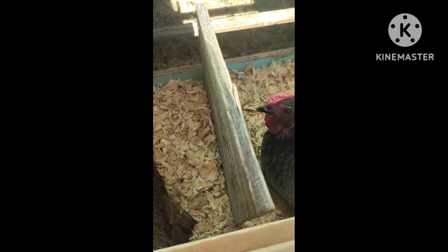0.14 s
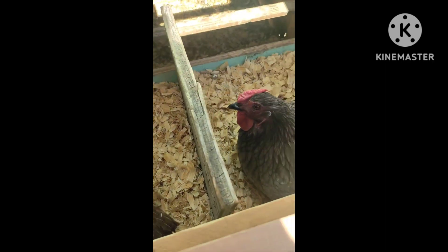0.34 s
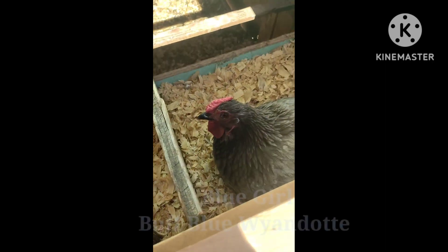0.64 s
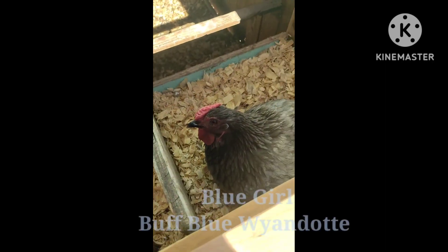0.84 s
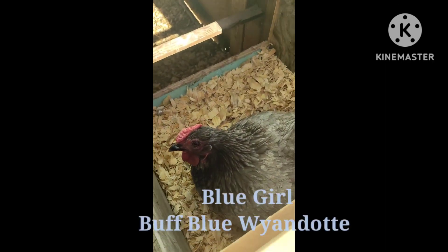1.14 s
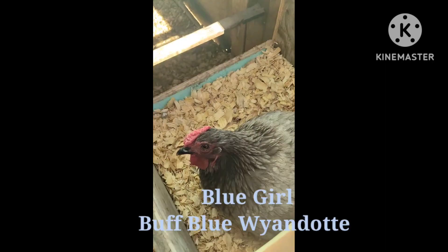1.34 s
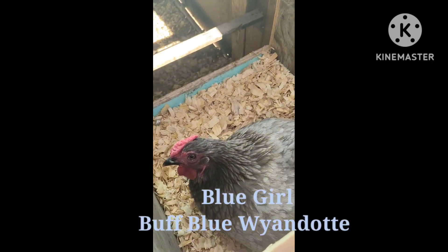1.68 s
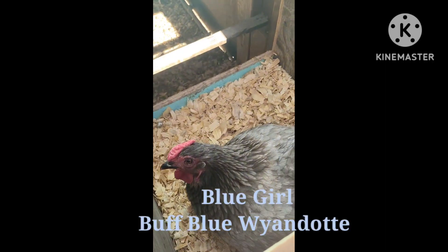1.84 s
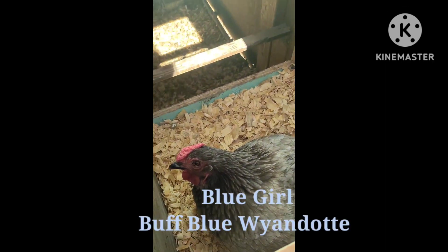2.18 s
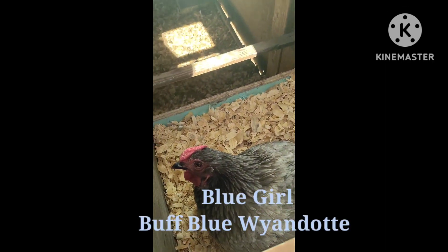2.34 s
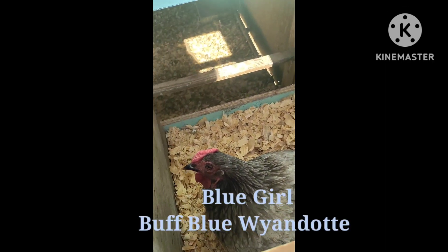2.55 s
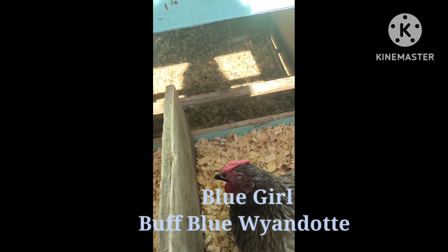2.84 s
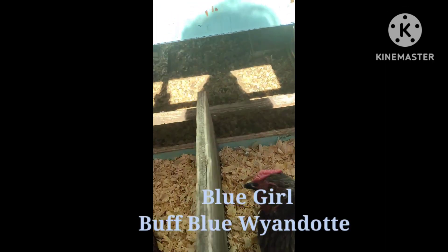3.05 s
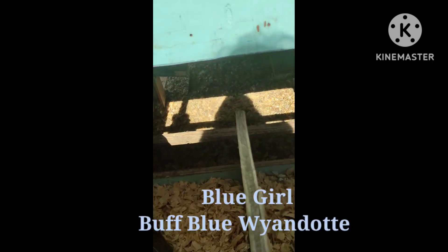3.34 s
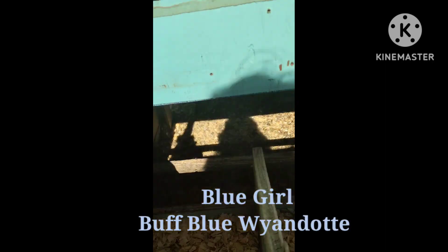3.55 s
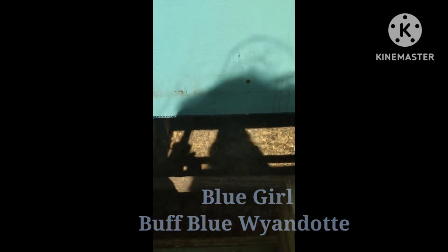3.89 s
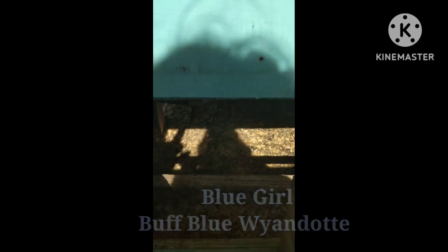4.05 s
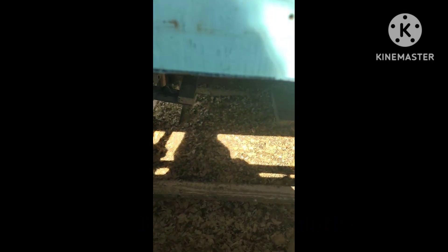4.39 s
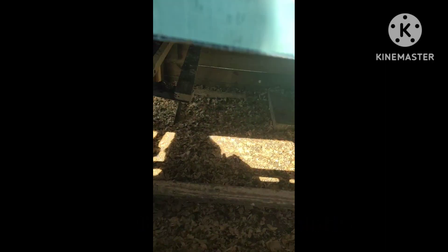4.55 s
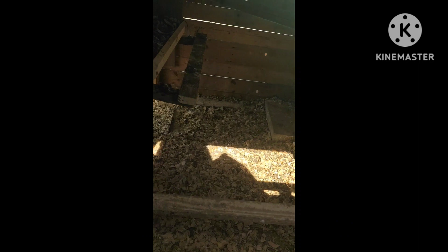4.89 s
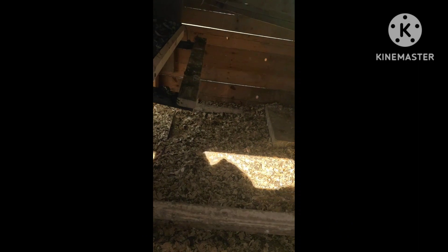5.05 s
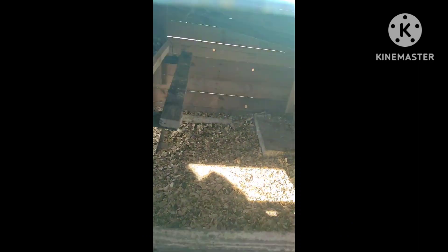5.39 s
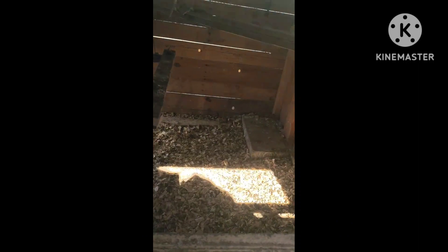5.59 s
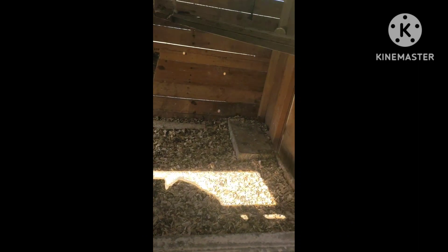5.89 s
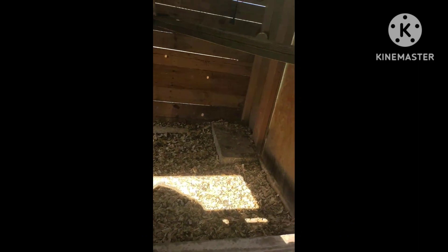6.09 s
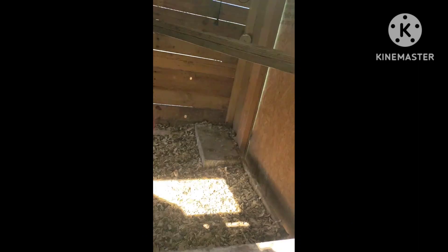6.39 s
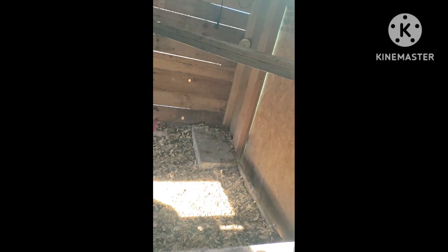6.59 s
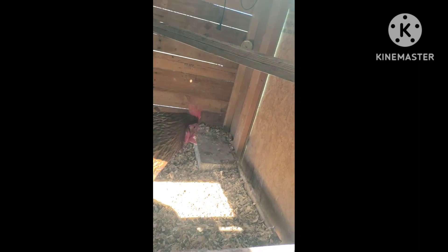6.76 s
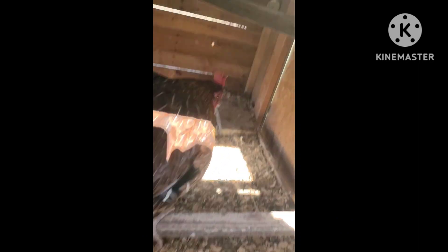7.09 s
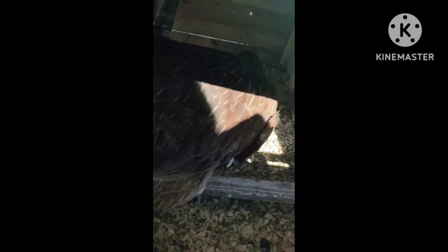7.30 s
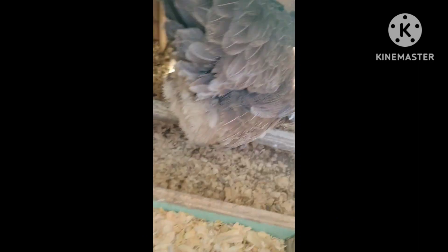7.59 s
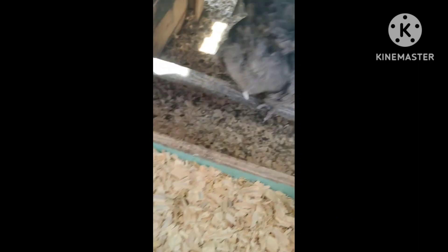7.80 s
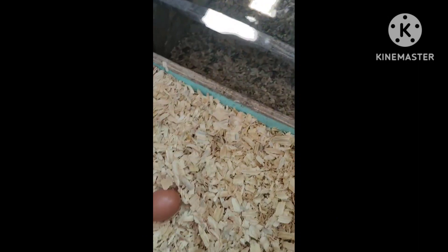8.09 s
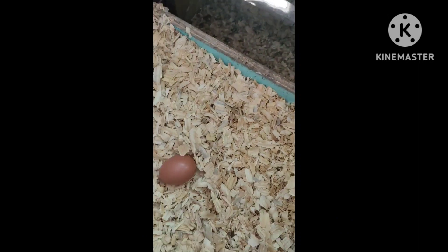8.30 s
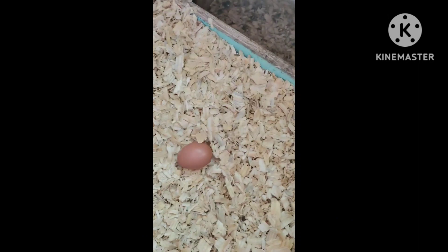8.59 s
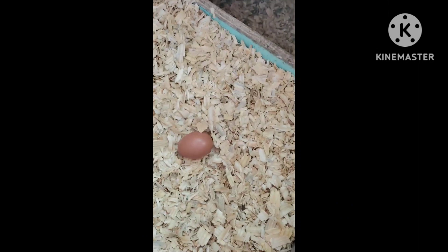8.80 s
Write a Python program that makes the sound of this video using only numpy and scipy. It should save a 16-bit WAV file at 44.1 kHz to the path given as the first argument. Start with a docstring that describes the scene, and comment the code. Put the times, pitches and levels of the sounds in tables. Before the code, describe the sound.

Wind buffets the microphone as a hen moans hoarsely and whines; boards knock, two harsh squawks burst out, then shavings crackle and soft clucks follow.

```python
"""Air buffets a microphone while rustling and a thin far whistle are heard; soon a hen moans low and hoarse.
Clucks, a wavering whine, two loud squawks and a growl follow, among knocked boards and snapping shavings.
Every call starts as pulses from the hen's voice box, which are coloured by the throat and let out by the beak.
Boards ring as fading tones; air, cloth, shavings and the yard are filtered noise; far birds are thin tones."""
import sys
import numpy as np
from scipy import signal
from scipy.fft import rfft, irfft, next_fast_len
from scipy.io import wavfile
from scipy.ndimage import uniform_filter1d, map_coordinates

SR = 44100
rng = np.random.default_rng(int(sys.argv[2]) if len(sys.argv) > 2 else 0)


def wav_out(sig):
    """Save sig, one row per channel (or a flat mono array), as 16-bit PCM at SR to the path in sys.argv[1]."""
    wavfile.write(sys.argv[1], SR, np.round(np.clip(np.atleast_2d(sig).T, -1, 1) * 32767).astype(np.int16))


N = 394254
TIME = np.arange(N) / SR
CUTOFF_HZ = 7900

# voice of each moan, and of the growl: time_s, pitch_hz, roughness (0-1)
MOAN_VOICE = [
    [(.31, 123, 0.75), (.41, 134.6, 0.2), (.55, 141.9, 0.37), (.64, 144.1, 0.03), (.745, 144.6, 0.03),
     (.8, 135, 0.13), (.87, 120.4, 0.34)],
    [(2.445, 127.1, 1.05), (2.55, 137, 0.3), (2.82, 144, 0.29), (2.95, 142.2, 0.1), (2.99, 131.2, 0.2)],
]
GROWL_VOICE = [(6.855, 130, 0.28), (6.93, 149, 0.76), (6.98, 148, 0.061), (7.06, 139.1, 0.62),
               (7.14, 118, 0.26)]
# loudness of each moan: time_s, lower_resonance_db, upper_resonance_db, overtones_db
MOAN_LEVEL = [
    [(.31, -54.5, -60, -67), (.42, -56.5, -50.5, -67), (.6, -53, -51, -59), (.77, -58, -56, -64),
     (.87, -61, -73, -80)],
    [(2.445, -47, -60, -69), (2.56, -51.5, -49, -64.5), (2.7, -50.5, -48, -57), (2.88, -52, -46, -55.5),
     (2.99, -50, -53.5, -61)],
]
# loudness of the growl: time_s, body_db, overtones_db
GROWL_LEVEL = [(6.855, -48.5, -79), (6.905, -51.5, -57.5), (6.985, -40, -50), (7.02, -50, -57.5),
               (7.085, -53, -65), (7.14, -72, -90)]
# pitch that each whine aims at: time_s, pitch_hz
WHINE_PITCH = [
    [(1.42, 446), (1.47, 423), (1.56, 519), (1.615, 502), (1.65, 430.2), (1.85, 456), (2.11, 479),
     (2.19, 448), (2.3, 477), (2.4, 427)],
    [(5.34, 436.5), (5.46, 430.3), (5.56, 465), (5.86, 445.3), (5.925, 411), (5.96, 335)],
]
# loudness of each whine: time_s, fundamental_db, overtones_db
WHINE_LEVEL = [
    [(1.42, -53, -69), (1.442, -48.5, -46), (1.57, -48, -57), (1.656, -45.5, -48.5), (2.108, -43, -46.5),
     (2.142, -41.5, -42), (2.346, -43, -44), (2.386, -52, -49.5), (2.41, -84, -58)],
    [(5.335, -52, -57), (5.388, -46, -39), (5.512, -37.5, -39), (5.654, -38, -41.5), (5.728, -53, -43.5),
     (5.776, -45.5, -35), (5.798, -48.5, -46), (5.94, -52, -39.5)],
]
# whines, dull when the hen faces away: start_roughness (0-1), end_roughness (0-1), end_treble_db
WHINES = [(0.2, 0.7, -4.5), (.35, 0.08, -14)]
# the whining voice slips off its pitch and back: middle_s, length_s, jump_hz
SLIPS = [(1.986, 0.028, 34), (2.081, 0.048, 184.5), (5.38, 0.031, -36), (5.423, 0.018, -41.5),
         (5.7, 0.022, -49), (5.744, 0.025, -72), (5.821, 0.031, -40.5), (5.893, 0.017, -49)]
WHINE_ROUGH_START_S = 0.16   # time in which the first roughness dies down
WHINE_SLIP_ROUGH = 0.25   # roughness added while the voice slips
WHINE_BRIGHTEN_DB = 1.5   # the treble gains this much as she strains through the call
# pitch of each squawk: time_s, pitch_hz
SQUAWK_PITCH = [
    [(5.965, 443), (5.99, 480.6), (6.012, 450), (6.03, 536), (6.046, 581), (6.09, 583), (6.118, 611),
     (6.13, 543), (6.152, 524), (6.205, 446.6)],
    [(6.305, 431), (6.33, 528), (6.355, 484.6), (6.372, 542.6), (6.436, 577.7), (6.47, 489), (6.5, 449)],
]
# loudness of each squawk, a short lead-in before the full cry:
# time_s, first_resonance_db, second_resonance_db, rasp_db
SQUAWK_LEVEL = [
    [(5.965, -44, -60, -61), (5.989, -27, -41, -44), (6.015, -29, -40, -40), (6.035, -20, -27, -31),
     (6.072, -18.5, -32, -30), (6.093, -12.5, -34, -34), (6.14, -17, -21, -32), (6.163, -23, -35, -35),
     (6.205, -51, -63, -63)],
    [(6.305, -44, -64, -65), (6.333, -22, -32, -36), (6.361, -29, -41, -40), (6.402, -14.5, -25, -24.5),
     (6.423, -16, -32, -33), (6.447, -15.5, -23.5, -29), (6.467, -21, -36, -36), (6.5, -51, -61, -59)],
]
# a squawk breaks from a clear tone into a rasp: middle_s, length_s, added_roughness (0-1)
BREAKS = [(5.975, .035, .65), (6.058, .03, .55), (6.105, .05, .25), (6.172, .03, .7), (6.325, .035, .45),
          (6.44, .025, .6), (6.485, .035, .7)]
# strong-weak pulses, which sound lines half way between the harmonics: middle_s, length_s
DOUBLINGS = [(6.05, 0.051), (6.152, 0.025), (6.453, 0.02)]
DOUBLING_DEPTH, SQUAWK_CLEAR_ROUGH, SQUAWK_AIR_DB = 0.98, 0.13, -6
# clucks: loudest_s, level_db, swell_s, half_fade_s, pitch_hz, roughness (limited to 0-1),
# overtones_db (relative to the level), lower_resonance_hz, upper_resonance_hz
CLUCKS = [(1.094, -44.5, 0.0046, 0.0061, 139.1, 0.36, -21, 623, 1310),
          (1.245, -47, 0.0052, 0.0075, 140.7, 1.08, -21, 680, 1290),
          (1.314, -58.5, 0.0026, 0.0044, 400, 0, -23, 796, 1200),
          (3.002, -46, 0.03, 0.008, 474, 0.7, -19, 700, 1000),
          (3.12, -63.5, 0.12, 0.063, 138.2, 1.1, -10.5, 680, 980),
          (5.777, -31, 0.025, 0.0026, 447.2, 0.65, -8, 910, 1380),
          (8.248, -42, 0.01, 0.011, 390.3, 0.35, -22, 728, 945),
          (8.551, -36, 0.018, 0.0046, 481.4, 0.71, -13, 830, 1050),
          (8.806, -41, 0.022, 0.015, 454.4, 0.54, -16.5, 745, 1020)]
# throat colour of each kind of call: frequency_hz, gain_db
MOAN_THROAT = [(140, -2), (280, -21), (425, -10.5), (570, -12), (720, -5.5), (850, 6.5), (1000, -2.5),
               (1140, 4), (1290, -6.5), (1450, -4), (1620, -12), (1920, -13), (2200, -19.5), (2750, -13.5),
               (3500, -31), (6500, -45)]
GROWL_THROAT = [(145, 0.5), (300, -30.5), (680, -21), (1030, 14), (1350, 0), (1800, -14), (2070, -10),
                (2250, -21), (3200, -16.5), (4080, -37), (4800, -23), (7000, -41.5)]
WHINE_THROAT = [(290, -4.5), (450, 6.5), (680, 4.5), (930, 0.5), (1350, -16.5), (1800, -29.5),
                (2300, -28.5), (2900, -21.5), (3650, -23), (4100, -41), (4650, -24), (6500, -64)]
SQUAWK_THROAT = [(540, -15), (700, -16), (930, -2), (1170, 9), (1370, 1), (1600, -15), (1850, -21),
                 (2200, -14), (2520, -21), (2780, -11), (3500, -26), (4300, -38), (5200, -29), (6200, -25),
                 (7800, -47)]
CLUCK_THROAT = [(200, 4), (450, -8.5), (800, 1.5), (2000, -7), (3050, -8), (3800, -25)]
MOAN_THROAT_HZ, GROWL_THROAT_HZ, SQUAWK_THROAT_HZ = 141.8, 149, 578   # pitch at which each colour holds
THROAT_FOLLOWS = 0.43   # share of a pitch change that the throat resonances follow
SHIMMER_DB, SHIMMER_FULL_HZ = 4.5, 3500   # each partial flickers on its own, the high ones most
# knocks on the boards: start_s, thud_db, thud_hz, clack_db
KNOCKS = [(4.3735, -22.5, 130, -28.5), (4.394, -33.5, 180, -40), (4.508, -37.5, 139, -39),
          (5.095, -42.5, 151, -58), (5.163, -58, 183, -43), (8.265, -29.5, 83, -48),
          (8.744, -32.5, 59.3, -68.5), (8.798, -26, 179, -59)]
# modes of the boards: frequency_hz, level_db (relative to the clack), t60_s
BOARD = [(204, -5, 0.12), (363, -34, 0.042), (525, -14.5, 0.18), (670, -5.5, 0.067), (685, -5, 0.051),
         (1020, -26, 0.019), (1210, -20, 0.092), (2230, -34, 0.022)]
# shavings snapping and shifting underfoot: time_s, crisp_top_db, dull_middle_db
SNAPS = [(0.38, -62, -84), (3.659, -72, -59.5), (3.9, -67, -61.5), (4.429, -53, -57), (5.489, -43, -45.5),
         (5.634, -52, -50), (6.652, -50, -45.5), (6.695, -52, -50), (7.224, -67, -55), (7.6598, -53, -57.5),
         (7.889, -61, -57.5), (8.021, -44, -45.5), (8.0613, -38, -46), (8.132, -48.5, -50),
         (8.2457, -38, -62), (8.287, -54, -53)]
# colours of the crisp and the dull part of a snap: frequency_hz, gain_db
SNAP_COLOUR = [(3800, -9.5), (5000, 8), (6500, 7.5), (7800, -11.5)]
SNAP_DULL_COLOUR = [(900, -2.5), (3000, -5.5), (4200, -15)]
# feet scuffing through the shavings: start_s, held_s, level_db
SCUFFS = [(3.6, 0.13, -71.5), (5.45, 0.38, -73.5), (6.59, 0.086, -63.5), (7.63, 0.16, -72.5),
          (7.89, 0.21, -68.5), (8.25, 0.073, -63)]
SCUFF_RISE_DB_PER_S, SCUFF_FADE_DB_PER_S = 1187, 392
# gusts on the microphone: start_s, held_s, level_db
GUSTS = [(0, 0.19, -39.5), (.44, 0.53, -43), (1.11, 0.4, -50.5), (1.81, 0.23, -49), (2.35, 0.13, -49.5),
         (2.67, 0.41, -50), (3.28, 0.44, -44.5), (3.85, 0.059, -55.5), (4.52, 2.28, -56),
         (6.37, 0.14, -42.5), (7.0, 0.3, -58), (7.43, 0.028, -53.5), (7.68, 1.65, -61), (7.97, 0.092, -50)]
GUST_RISE_DB_PER_S, GUST_FADE_DB_PER_S, CALM_DB = 218.5, 159, -81
# sharp puffs: time_s, peak_db
PUFFS = [(0.009, -27), (0.038, -20.5), (0.082, -34), (0.597, -30.5), (0.66, -29), (0.739, -28.5),
         (0.912, -39), (0.965, -33), (1.464, -33), (3.345, -24), (3.428, -33.5), (3.57, -30.5),
         (3.606, -31)]
# colours of the large eddies, and of the small eddies and puffs: frequency_hz, gain_db
BUFFET_COLOUR = [(20, -14), (50, 3.5), (85, 2.5), (130, -8.5), (220, -23), (500, -51.5)]
GUST_COLOUR = [(60, -5), (110, 0), (210, -8.5), (330, -21), (520, -37.5)]
# strokes of the hand on the case: start_s, held_s, level_db
RUBS = [(4.46, 2.23, -55.5), (5.08, 0.13, -47), (7.76, 0.16, -57), (7.98, 0.32, -47)]
RUB_RISE_DB_PER_S, RUB_FADE_DB_PER_S = 203, 131.5
# spells of rustling cloth and litter: start_s, held_s, level_db
RUSTLES = [(0, 0.5, -72.5), (1.1, 1.12, -71.5), (2.8, 0.44, -65.5), (3.6, 0.21, -73), (4.33, 0.31, -67.5),
           (4.82, 0.41, -61), (5.4, 0.39, -59.5), (6.2, 0.54, -66.5), (7.97, 0.38, -64.5),
           (8.45, 0.42, -62.5)]
RUSTLE_RISE_DB_PER_S, RUSTLE_FADE_DB_PER_S, RUSTLE_REST_DB = 88, 69.5, -80.5
# colours of the rubbing, and of the rustling and scuffing: frequency_hz, gain_db
RUB_COLOUR = [(90, -13), (160, 2.5), (270, -7.5), (420, -20), (1100, -39.5)]
RUSTLE_COLOUR = [(400, 3), (1380, -3.5), (1800, -8), (2600, -5), (3400, -9), (3950, -20.5), (4800, -8),
                 (6300, -9.5), (7420, -16.5), (8000, -45)]
# thin calls of distant birds: start_s, length_s, pitch_hz, level_db, waver_hz
WHISTLES = [(0, 1.05, 1565, -77, 12), (0.835, 0.12, 4390, -76, 15), (2.362, .15, 4340, -79, 15),
            (4.06, .36, 2450, -75, 45)]
# colour of the quiet yard: frequency_hz, gain_db
YARD_COLOUR = [(25, -4.5), (84, -11), (130, -17), (240, -22.5), (1000, -42.5), (1700, -46), (2500, -37),
               (4000, -46.5), (6280, -38.5), (8000, -76)]
YARD_DB = -65


def from_db(db):
    """Decibels to gain."""
    return 10 ** (np.asarray(db) / 20)


def rms_one(x):
    """Scale to an average strength (rms) of 1."""
    return x / np.sqrt(np.mean(x ** 2) + 1e-20)


def along(rows, t):
    """Read each column of a curve at the times t."""
    s, *columns = np.transpose(rows)
    return [np.interp(t, s, c) for c in columns]


def span(rows):
    """Sample times covered by a curve."""
    return np.arange(rows[0][0], rows[-1][0], 1 / SR)


def colour(x, outline):
    """Filter by an outline of (Hz, dB) points that falls 20 dB an octave beyond its ends."""
    size = next_fast_len(len(x) + 4096)
    octave = np.log2(np.arange(size // 2 + 1) * SR / size + 1)
    hz, db = np.transpose(outline)
    beyond = np.abs(octave - np.clip(octave, np.log2(hz[0]), np.log2(hz[-1])))
    gain = from_db(np.interp(octave, np.log2(hz), db) - 20 * beyond)
    return irfft(rfft(x, size) * gain, size)[:len(x)]


def cut(x, hz, kind, order=2):
    """Butterworth filter: "low" keeps what lies below hz, "high" what lies above."""
    return signal.sosfilt(signal.butter(order, min(hz, SR / 3), kind, fs=SR, output="sos"), x)


def wander(rate, size):
    """Smooth random curve of rms 1, with about `rate` turns a second."""
    knots = rng.standard_normal(size // 16 + 8)
    return rms_one(map_coordinates(knots, [np.arange(size) * rate / SR], order=3, mode="wrap"))


def steady(x, seconds=0.051):
    """Even out the slow level, keeping the fast flutter."""
    power = uniform_filter1d(x ** 2, max(int(seconds * SR), 2))
    return x / np.sqrt(np.abs(power) + 1e-12)


def bump(t, s, length):
    """A smooth plateau of height 1 centred on s."""
    return np.exp(-np.abs(2 * (t - s) / length) ** 3)


def swells(events, rise_db_per_s, fade_db_per_s):
    """Joint level in dB of (start, held, dB) events that rise before the start, hold, then fade."""
    power = 1e-14
    for s, held, db in events:
        early, late = np.maximum(s - TIME, 0), np.maximum(TIME - s - held, 0)
        power = power + from_db(db - rise_db_per_s * early - fade_db_per_s * late) ** 2
    return 10 * np.log10(power)


def ring(t, hz, db, t60):
    """One tone that falls 60 dB in t60 seconds."""
    return from_db(db - 60 * t / t60) * np.sin(2 * np.pi * hz * t)


def add(out, start, x):
    """Mix x into out from the time start on."""
    i = max(int(start * SR), 0)
    out[i:i + len(x)] += x[:max(N - i, 0)]


def syrinx(pitch, rough, jitter, flutter, hiss, waver):
    """The voice box: membrane pulses; when rough, timing scatters, every third one swells and air hisses."""
    size, rough = len(pitch), np.clip(rough, 0, 1)
    mean_hz = np.mean(pitch)
    phase = 2 * np.pi * np.cumsum(pitch * (1 + waver * wander(70, size))) / SR
    phase = phase + jitter * rough * wander(mean_hz, size)
    pulses = 0
    for k in range(1, int(CUTOFF_HZ / mean_hz) + 1):
        shimmer_db = SHIMMER_DB * min(k * mean_hz / SHIMMER_FULL_HZ, 1) * wander(45, size)
        pulses = pulses + from_db(shimmer_db) * np.cos(k * phase + np.pi * k * k / 9)
    every_third = np.cos(phase / 3 + wander(60, size))
    swell = 1 + flutter * rough * (every_third + .5 * wander(300, size))
    air = rng.standard_normal(size) * (1 + np.cos(phase))   # air rushes through each opening
    return rms_one(pulses) * swell + hiss * (rough ** 2 + .1) * air


def glide(x, outline, pitch_ratio, count=5):
    """Colour x by throat resonances that rise and fall with the pitch, blending fixed settings."""
    shift = pitch_ratio ** THROAT_FOLLOWS
    steps = np.linspace(shift.min(), shift.max(), count)
    out = 0
    for step, share in zip(steps, np.eye(count)):
        blend = np.interp(shift, steps, share)
        out = out + blend * colour(x, np.multiply(outline, [step, 1]))
    return out


def beak(x, splits_hz, levels_db):
    """The opening of the beak sets how much of each resonance gets out, from the lowest up."""
    parts = []
    for hz in splits_hz:
        parts.append(cut(x, hz, "low", order=10))
        x = cut(x, hz, "high", order=10)
    ends = signal.windows.tukey(len(x), min(.012 * SR / len(x), 1))   # soft start and stop
    return ends * sum(from_db(db) * steady(part) for part, db in zip(parts + [x], levels_db))


def low_call(voice, level, outline, throat_hz, splits_hz, flicker_db=4, edge_s=0.028):
    """Slow pulses pass the throat; while the voice is rough, each resonance flickers on its own."""
    out, t = np.zeros(N), span(voice)
    pitch, rough = along(voice, t)
    source = syrinx(pitch, rough, jitter=.24, flutter=.45, hiss=.6, waver=.008)
    levels_db = [db + flicker_db * rough * wander(71.2, len(t)) for db in along(level, t)]
    edges = np.minimum(np.minimum(t - t[0], t[-1] - t) / edge_s, 1)
    throat = glide(source, outline, pitch / throat_hz)
    add(out, t[0], edges * beak(throat, splits_hz, levels_db))
    return out


def moans():
    """Two moans on a pair of close resonances start hoarse, then clear; a short growl has one resonance."""
    out = low_call(GROWL_VOICE, GROWL_LEVEL, GROWL_THROAT, GROWL_THROAT_HZ, [1350])
    for voice, level in zip(MOAN_VOICE, MOAN_LEVEL):
        out = out + low_call(voice, level, MOAN_THROAT, MOAN_THROAT_HZ, [990, 1520])
    return out


def whines():
    """A nearly closed beak lets out mostly the first two partials, with slips in pitch and roughness."""
    out = np.zeros(N)
    for (first_rough, last_rough, treble_db), contour, level in zip(WHINES, WHINE_PITCH, WHINE_LEVEL):
        t = span(contour)
        pitch = along(contour, t)[0] + sum(jump_hz * bump(t, s, length) for s, length, jump_hz in SLIPS)
        rough = first_rough * np.exp(-(t - t[0]) / WHINE_ROUGH_START_S)
        rough = rough + last_rough * np.linspace(0, 1, len(t))
        rough = rough + WHINE_SLIP_ROUGH * sum(bump(t, s, length) for s, length, _ in SLIPS)
        source = syrinx(pitch, rough, jitter=.23, flutter=.85, hiss=.45, waver=0.013)
        treble = from_db(treble_db + WHINE_BRIGHTEN_DB * np.linspace(-1, 0, len(t)))
        source = source + (treble - 1) * colour(source, [(1900, -30), (2500, 0), (CUTOFF_HZ, 0)])
        add(out, t[0], beak(colour(source, WHINE_THROAT), [720], along(level, t)))
    return out


def squawks():
    """Hard-blown calls that break between a clear tone and a rasp."""
    out = np.zeros(N)
    for contour, level in zip(SQUAWK_PITCH, SQUAWK_LEVEL):
        t = span(contour)
        pitch, = along(contour, t)
        rough = SQUAWK_CLEAR_ROUGH + sum(depth * bump(t, s, length) for s, length, depth in BREAKS)
        source = syrinx(pitch, rough, jitter=.36, flutter=.9, hiss=.3, waver=.008)
        doubling = DOUBLING_DEPTH * sum(bump(t, s, length) for s, length in DOUBLINGS)
        half_pitch = np.cos(np.pi * np.cumsum(pitch) / SR)
        source = source * (1 + doubling * half_pitch)
        air = rng.standard_normal(len(t)) * from_db(9 * wander(400, len(t)))   # sputters in the open beak
        source = source + from_db(SQUAWK_AIR_DB) * np.sqrt(rough) * cut(air, 4200, "high", order=4)
        throat = glide(source, SQUAWK_THROAT, pitch / SQUAWK_THROAT_HZ)
        add(out, t[0], beak(throat, [1750, 2550], along(level, t)))
    return out


def clucks(arch=1.5, sharpness=6, boost_db=13):
    """Short notes swell and fade through two throat resonances, their pitch highest when loudest."""
    out, t = np.zeros(N), np.arange(-.1, .3, 1 / SR)
    for s, db, swell, half_fade, pitch, rough, overtones_db, *resonances_hz in CLUCKS:
        envelope = np.exp(-(t / np.where(t < 0, swell, 2 * half_fade)) ** 2)
        arched = pitch * np.exp(-arch * np.abs(t))
        source = syrinx(arched, rough, jitter=0.79, flutter=0.95, hiss=1.7, waver=0.0098)
        peaks = [signal.lfilter(*signal.iirpeak(hz, sharpness, fs=SR), source) for hz in resonances_hz]
        throat = colour(source + from_db(boost_db) * sum(peaks), CLUCK_THROAT)
        add(out, s + t[0], envelope * beak(throat, [1480], [db, db + overtones_db]))
    return out


def knocks(crack_db=-4, crack_t60=0.041):
    """Each blow gives a low thud of the frame, a short dull crack, and rings the modes of the boards."""
    out, t = np.zeros(N), np.arange(SR // 3) / SR
    for s, thud_db, thud_hz, clack_db in KNOCKS:
        add(out, s, ring(t, thud_hz, thud_db, t60=.1))
        crack = rms_one(cut(rng.standard_normal(len(t)), 740, "low", order=3))
        add(out, s, crack * from_db(clack_db + crack_db - 60 * t / crack_t60))
        for hz, mode_db, t60 in BOARD:
            add(out, s, ring(t, hz, clack_db + mode_db + rng.normal(0, 1), t60))
    return cut(out, 55, "high", order=3)


def snaps(t60=0.07, grain_db=4.0, onset_s=0.0049):
    """A dry shaving breaks in a quickly dying spray of tiny cracks."""
    out, t = np.zeros(N), np.arange(SR // 8) / SR
    for s, crisp_db, dull_db in SNAPS:
        spray = 0
        for db, outline in ((crisp_db, SNAP_COLOUR), (dull_db, SNAP_DULL_COLOUR)):
            spray = spray + from_db(db) * rms_one(colour(rng.standard_normal(len(t)), outline))
        cracks = spray * from_db(grain_db * wander(450, len(t)))
        onset = 1 - np.exp(-(t / onset_s) ** 2)
        add(out, s - onset_s, cracks * onset * from_db(1.0 - 60 * t / t60))
    return out


def scuffs(cracks_per_s=700, size_db=8.0, slide=0.32, ring_cycles=22, count=12):
    """Claws push shavings aside: each flake ticks briefly at one of several pitches, over a soft slide."""
    born = rng.random(N) < cracks_per_s * from_db(5 * wander(45, N)) / SR
    sizes = from_db(size_db * np.minimum(rng.exponential(1, N), 3))
    cracks = born * rng.choice([-1, 1], N) * sizes
    dealt, t = rng.integers(0, count, N), TIME[:SR // 40]
    ticks = 0
    for k, hz in enumerate(np.geomspace(1100, 7200, count)):
        tick = hz * ring(t, hz, 0, ring_cycles / hz)
        ticks = ticks + signal.oaconvolve(cracks * (dealt == k), tick)[:N]
    crackle = rms_one(colour(rms_one(ticks) + slide * rng.standard_normal(N), RUSTLE_COLOUR))
    return crackle * from_db(swells(SCUFFS, SCUFF_RISE_DB_PER_S, SCUFF_FADE_DB_PER_S))


def coop(x, t60, wet_db):
    """Close plank walls return a short, dull scatter of echoes."""
    t = np.arange(SR // 2) / SR
    echoes = cut(rng.standard_normal(len(t)), 3200, "low") * from_db(-60 * t / t60)
    echoes = echoes * (t > .004)   # the first echo arrives a little late
    return x + from_db(wet_db) * signal.fftconvolve(x, echoes / np.sqrt(np.sum(echoes ** 2)))[:N]


def buffeting(lumpy_db=14.0, puff_s=0.0038, gust_growth=2.4, gust_db=-7):
    """Lumpy low pressure noise at the microphone; strong gusts add smaller, higher eddies; puffs are sharp."""
    level_db = np.maximum(swells(GUSTS, GUST_RISE_DB_PER_S, GUST_FADE_DB_PER_S), CALM_DB)
    eddies = steady(colour(rng.standard_normal(N), BUFFET_COLOUR), seconds=0.025)
    eddies = eddies * from_db(level_db + 2.0 * wander(27, N))
    small = steady(colour(rng.standard_normal(N), GUST_COLOUR), seconds=0.011)
    small = small * from_db(lumpy_db * np.tanh(wander(70, N)))
    small = small * from_db(gust_db - 42.0 + gust_growth * (level_db + 42.0))   # grows faster than the gust
    puffs, t = np.zeros(N), np.arange(-SR // 20, SR // 12) / SR
    for s, db in PUFFS:
        age = np.maximum(t, 0) / puff_s
        puff = colour(rng.standard_normal(len(t)) * age * np.exp(-age), GUST_COLOUR)
        puff = puff * signal.windows.hann(len(t))
        add(puffs, s + t[0] - puff_s / 2, from_db(db) * puff / np.abs(puff).max())
    return eddies + small + puffs


def rubbing(uneven_db=3.0):
    """Fingers drag on the case with a dull murmur."""
    drag = colour(rng.standard_normal(N) * from_db(uneven_db * wander(60, N)), RUB_COLOUR)
    return steady(drag, seconds=0.54) * from_db(swells(RUBS, RUB_RISE_DB_PER_S, RUB_FADE_DB_PER_S))


def rustle(grains_per_s=300, grain_db=-2.0, uneven_db=0.55):
    """A soft sliding hiss of cloth and litter with crisp grains that come in clumps."""
    level_db = np.maximum(swells(RUSTLES, RUSTLE_RISE_DB_PER_S, RUSTLE_FADE_DB_PER_S), RUSTLE_REST_DB)
    born = rng.random(N) < grains_per_s * from_db(5 * wander(35, N)) / SR
    sizes = from_db(grain_db * np.minimum(rng.exponential(1, N), 3))
    grains = born * rng.choice([-1, 1], N) * sizes
    hiss = rms_one(colour(rng.standard_normal(N) + 21.0 * grains, RUSTLE_COLOUR))
    return from_db(level_db + uneven_db * wander(8.5, N)) * hiss


def far_birds():
    """Thin far calls swell and fade, some nearly pure, some wavering more."""
    out = np.zeros(N)
    for s, length, hz, db, waver_hz in WHISTLES:
        t = np.arange(0, length, 1 / SR)
        pitch = hz + waver_hz * wander(210, len(t))
        tone = np.sin(2 * np.pi * np.cumsum(pitch) / SR)
        add(out, s, from_db(db) * np.sin(np.pi * t / length) * tone)
    return out


def yard():
    """The quiet yard is a steady, faint, mostly low noise."""
    return from_db(YARD_DB) * rms_one(colour(rng.standard_normal(N), YARD_COLOUR))


def scene():
    """Hens and wood inside the coop, handling at the microphone, a quiet yard behind."""
    near = coop(whines() + squawks() + knocks() + snaps() + scuffs(), t60=0.1, wet_db=-15.0)
    far = coop(moans() + clucks(), t60=0.095, wet_db=-10.0)
    return (near + far + buffeting() + rubbing() + rustle() + far_birds() + yard())[None]


def record(dry, top=0.54):
    """The loudest peaks are rounded off; the recorder removes nearly all above its cut-off."""
    rounded = top * np.tanh(dry / top)
    return signal.sosfilt(signal.ellip(10, .3, 80, CUTOFF_HZ, fs=SR, output="sos"), rounded)


dry = scene()
out = record(dry)
wav_out(out)
```